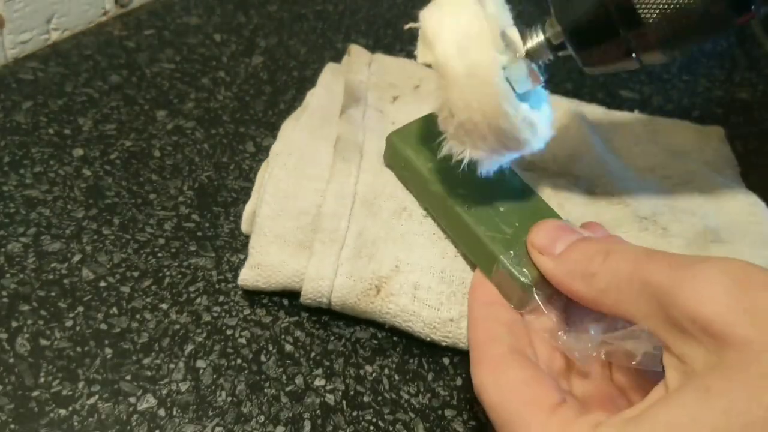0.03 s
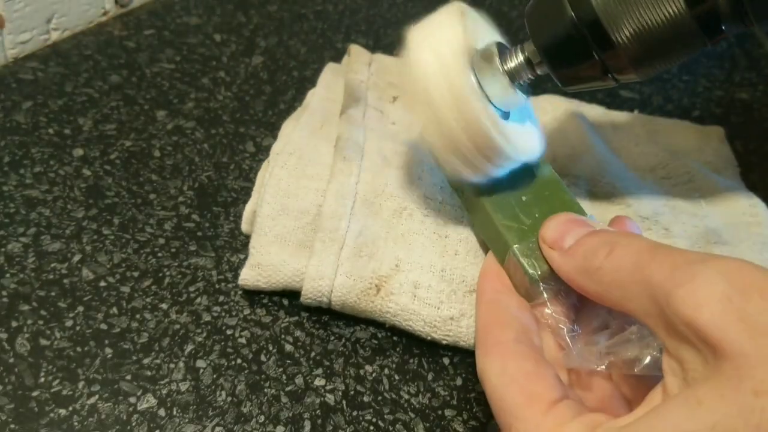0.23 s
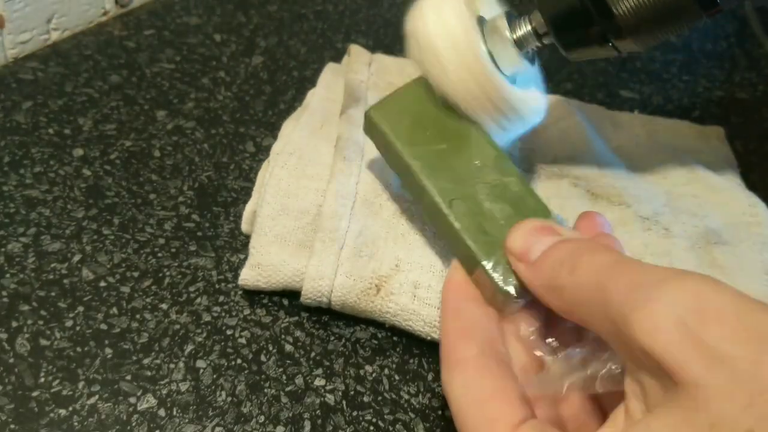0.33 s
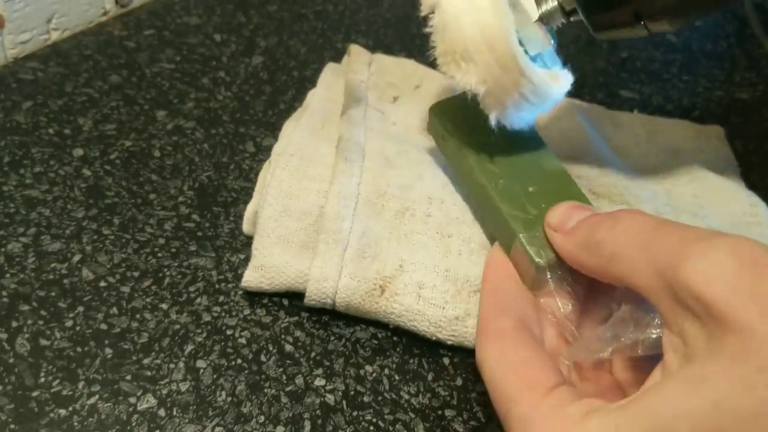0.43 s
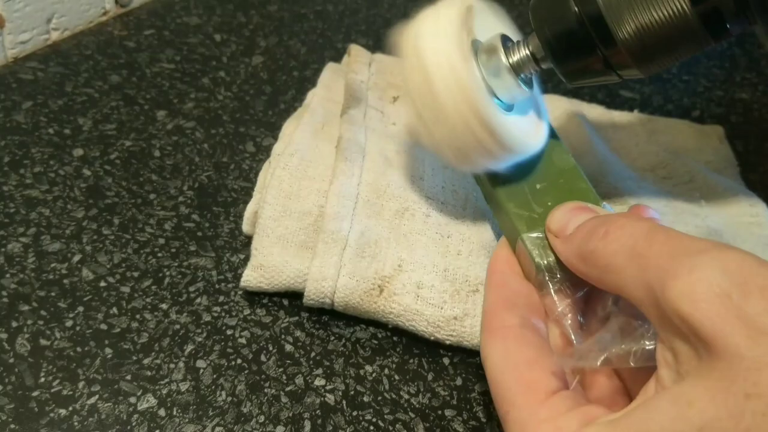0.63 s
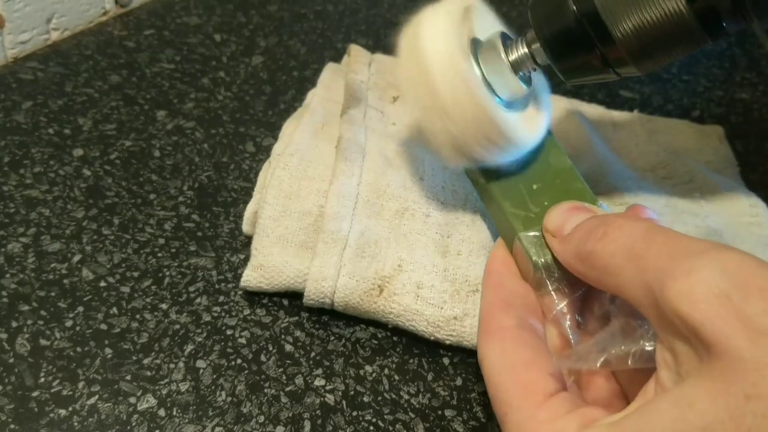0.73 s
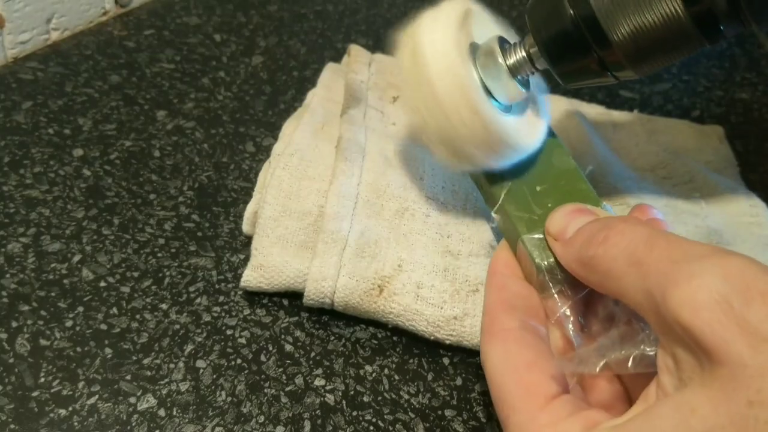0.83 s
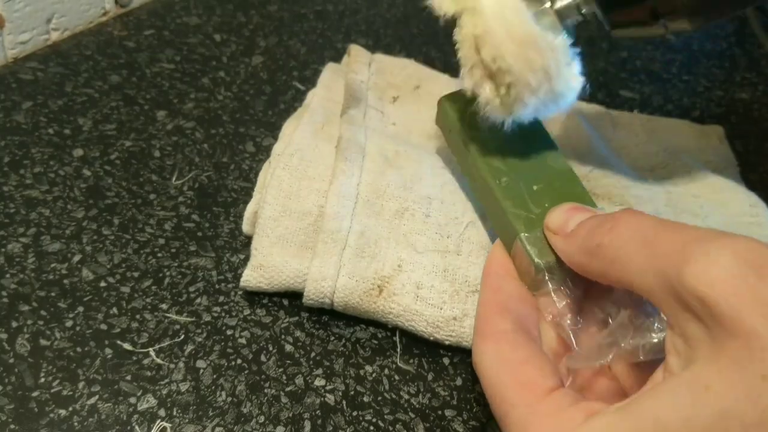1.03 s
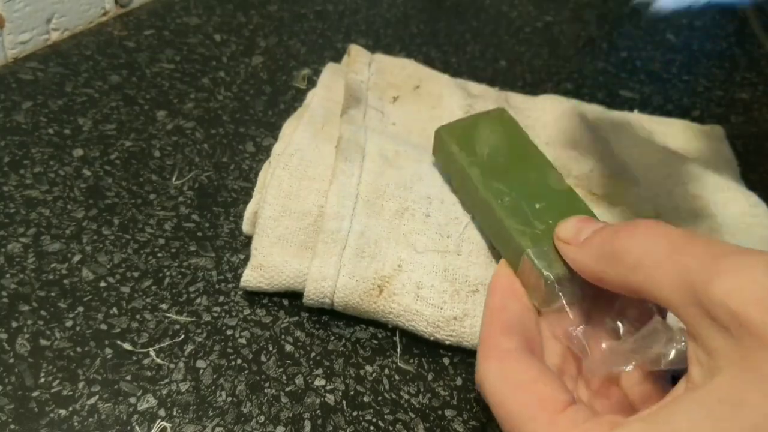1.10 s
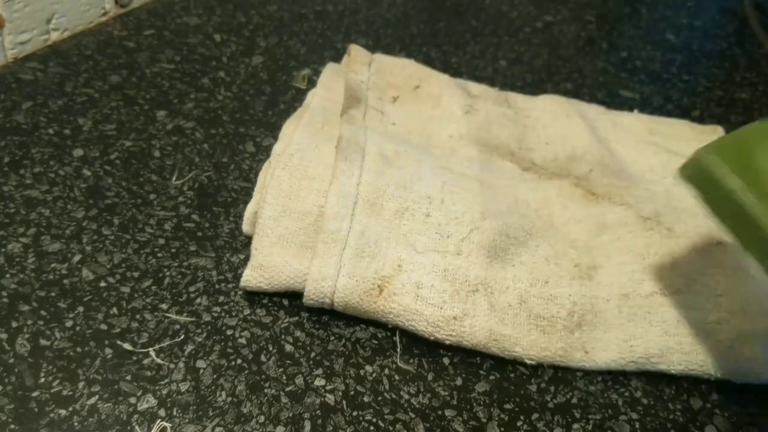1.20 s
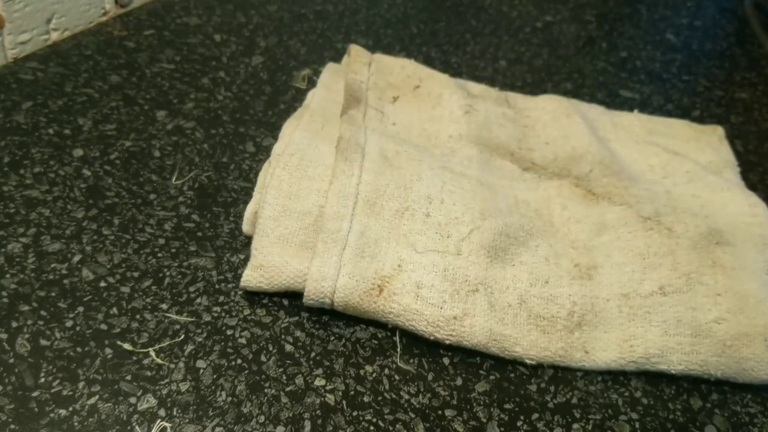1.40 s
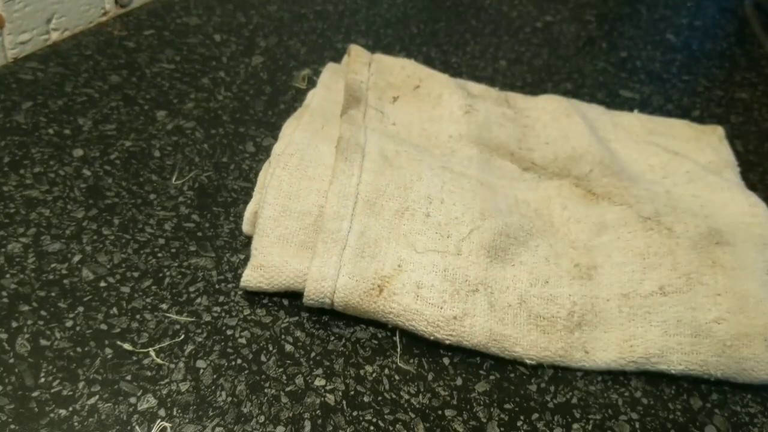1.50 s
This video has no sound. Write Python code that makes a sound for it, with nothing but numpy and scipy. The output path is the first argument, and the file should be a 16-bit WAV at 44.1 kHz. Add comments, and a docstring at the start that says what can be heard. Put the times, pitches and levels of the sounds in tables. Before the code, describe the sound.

A cordless drill whirs briefly and stops with a clunk, then runs faster and longer before a second clunk. Its cloth buffing wheel flaps softly against a bar of polishing compound, close by in a quiet room.

```python
"""In a quiet room, a cordless drill spins a cloth buffing wheel against a bar of polishing compound.
The housing rings as the motor pulls away. Motor and gear teeth hum and whine with the speed over
a rasp of brushes and gears; the cloth flaps on the bar. At 0.4 s the brake stops the chuck with a clunk.
A second, faster and longer run starts at 0.5 s and ends in another clunk at 1.0 s."""
import sys
import numpy as np
from scipy import signal
from scipy.fft import rfft, irfft
from scipy.io import wavfile

SR = 44100
rng = np.random.default_rng(int(sys.argv[2]) if len(sys.argv) > 2 else 0)


def store_pcm(level_fs):
    """Save levels as 16-bit WAV."""
    pcm = np.round(np.clip(level_fs, -1, 1) * 32767).astype(np.int16)
    wavfile.write(sys.argv[1], SR, np.atleast_2d(pcm).T)


N = 68355
T = np.arange(N) / SR
BIN_HZ = np.fft.rfftfreq(N, 1 / SR)
BAND_EDGE_HZ = 15750


def amp(db):
    """Decibels to gain."""
    return 10 ** (np.asarray(db) / 20)


def unit_rms(x):
    """Scale to rms 1."""
    return x / np.sqrt(np.mean(x ** 2) + 1e-20)


def curve(points):
    """Straight lines through (time_s, value) points."""
    return np.interp(T, *np.transpose(points))


def colour(x, spectrum):
    """Filter by (freq_hz, gain_db) points."""
    freq_hz, gain_db = np.transpose(spectrum)
    bin_db = np.interp(np.log(BIN_HZ + 1), np.log(freq_hz), gain_db)
    return irfft(rfft(x) * amp(bin_db), N)


def noise(spectrum):
    """Coloured noise, rms 1."""
    return unit_rms(colour(rng.standard_normal(N), spectrum))


def drift(cutoff_hz):
    """Low-passed random wander, rms 1."""
    return unit_rms(irfft(rfft(rng.standard_normal(N)) / (1 + (BIN_HZ / cutoff_hz) ** 4), N))


def rough_tone(cycles, roughness, flutter_hz):
    """Tone with random flutter in amplitude and phase."""
    flutter = 1 + roughness * (drift(flutter_hz) + 1j * drift(flutter_hz))
    return (flutter * np.exp(2j * np.pi * (cycles + rng.random()))).real


def mode(start_s, freq_hz, level_db, t60_s, rise_s=0.0019):
    """One decaying vibration."""
    age_s = np.maximum(T - start_s, 0)
    envelope = np.minimum(age_s / rise_s, 1) * amp(level_db - 60 * age_s / t60_s)
    return envelope * np.sin(2 * np.pi * freq_hz * age_s)


# Room noise: freq_hz, gain_db
ROOM_SPECTRUM = [(12, -42), (20, 2), (85, -4), (140, -9.5), (274, -15), (416, -14.5), (491, -16),
                 (725, -17.5), (1300, -22.5), (2150, -24.5), (15500, -37.5)]

def room_hush(level_db=-69.5):
    """Steady, low background noise."""
    return amp(level_db) * noise(ROOM_SPECTRUM)


def room_echo(source, gain_db=-16.5, t60_s=0.12):
    """Reflections form a faint, short tail."""
    age_s = T[:SR // 3]
    tail = rng.standard_normal(len(age_s)) * amp(-60 * age_s / t60_s)
    tail /= np.linalg.norm(tail)
    return amp(gain_db) * signal.fftconvolve(source, tail[None], axes=1)[:, :N]


# Flapping envelope: time_s, level_db
CLOTH_ENVELOPE = [(.19, -79), (.235, -69), (.4, -59), (.44, -90), (.52, -95), (.545, -50), (.59, -72),
                  (.64, -57.5), (.8, -60.5), (.97, -52), (1.015, -57.5), (1.045, -76)]
# Flapping colour: freq_hz, gain_db
CLOTH_SPECTRUM = [(20, -21), (60, 0), (110, 8), (220, 1.5), (310, 0), (420, -13), (1000, -29), (4000, -66)]

def cloth_flap():
    """The soft rim of the wheel beats the bar."""
    return noise(CLOTH_SPECTRUM) * amp(curve(CLOTH_ENVELOPE))


# Bursts of starting torque: start_s, length_s, level_db
TORQUE_BURSTS = [(0.12, 0.028, -57.5), (0.15, 0.042, -62), (0.185, 0.031, -53), (0.515, .026, -43.5)]
# Housing resonance: freq_hz, gain_db
HOUSING_SPECTRUM = [(300, -24.5), (2000, -17.5), (2850, -21), (3220, 1), (3550, -11.5), (4100, -15.5),
                    (5000, -30), (15000, -47)]

def housing_ring(rise_s=0.011, decay_s=0.0063):
    """The gearbox rattles at its resonance while the motor pulls away."""
    envelope = np.zeros(N)
    for start_s, length_s, level_db in TORQUE_BURSTS:
        attack = np.clip((T - start_s) / rise_s, 0, 1)
        release = np.exp(-np.maximum(T - start_s - length_s, 0) / decay_s)
        envelope += amp(level_db) * attack * release
    return envelope * noise(HOUSING_SPECTRUM)


# Brake stops: start_s, thud_db, knock_db, ring_db, thud_hz
BRAKE_STOPS = [(.402, -47, -38.5, -55, 118), (1.01, -39, -46.5, -63.5, 246)]
# Chuck modes: freq_hz, gain_db, t60_s
CHUCK_MODES = [(2000, 3, 0.083), (5050, 1, 0.079), (8970, -7.5, 0.12), (14000, -1, 0.086)]

def brake_clunk():
    """The spindle locks: a thud, a knock and a short ring of the steel chuck."""
    out = np.zeros(N)
    for start_s, thud_db, knock_db, ring_db, thud_hz in BRAKE_STOPS:
        out += mode(start_s, thud_hz, thud_db, t60_s=0.064)
        out += mode(start_s, freq_hz=663, level_db=knock_db, t60_s=0.031)
        for freq_hz, gain_db, t60_s in CHUCK_MODES:
            out += mode(start_s, freq_hz, ring_db + gain_db, t60_s)
    return out


# Imbalance partials: cycles_per_turn, gain_db, roughness
HUM_PARTIALS = [(.343, -57.5, .45), (.572, -63, 0.38), (1, -51, 0.26)]

def imbalance_hum(speed_hz, turns, full_speed_hz=271.4):
    """Out-of-balance rotor and planet gears shake the drill, harder with speed."""
    out = np.zeros(N)
    for cycles_per_turn, gain_db, roughness in HUM_PARTIALS:
        out += amp(gain_db) * rough_tone(cycles_per_turn * turns, roughness, flutter_hz=35)
    return out * (speed_hz / full_speed_hz) ** 1.78


# Rasp envelope: time_s, gain_db
RASP_ENVELOPE = [(.11, -100), (.128, -66), (.185, -63.5), (.228, -48), (.26, -49.5), (.385, -47.5),
                 (.401, -48.5), (.412, -57.5), (.445, -95), (.51, -77), (.526, -59), (.546, -45.5),
                 (.6, -46.5), (.69, -42), (.8, -42), (.97, -41), (1.011, -42), (1.028, -62), (1.05, -93)]
# Impact colour: freq_hz, gain_db
RASP_SPECTRUM = [(100, -7.5), (430, -10.5), (620, -1.5), (900, -7), (1600, -2), (2450, -5), (3250, 2),
                 (3800, -1), (4600, -1.5), (5400, -2.5), (6300, -2), (7600, 0.5), (8600, -8.5), (10400, -8),
                 (11800, -1.5), (13000, 4), (14300, -4.5), (15800, -13)]
# Extra filter on the stereo side signal: freq_hz, gain_db
RASP_SIDE_SPECTRUM = [(100, -52), (3000, -58), (5500, -6), (7000, -30), (8500, -5.5), (10500, -3.5),
                      (13000, -29), (16000, 4)]

def brush_and_gear_rasp(speed_hz, turns, grain_db=3.5, buzz_db=-6.5, flicker_db=1.03, trim_db=-1):
    """Tiny impacts of brushes and teeth, partly repeating each turn, with a slight, steady flutter."""
    tick_depth, flutter_depth, flutter_hz = 0.13, 0.1, 42.2
    grains = rng.standard_normal(N) * amp(grain_db * rng.standard_normal(N))
    buzz = np.zeros(N)
    for harmonic in range(2, 90):
        in_band = harmonic * speed_hz < BAND_EDGE_HZ
        buzz += np.cos(2 * np.pi * (harmonic * turns + rng.random())) * rng.rayleigh() * in_band
    impacts = unit_rms(grains) + amp(buzz_db) * unit_rms(buzz)
    ticks = 1 + tick_depth * (np.cos(2 * np.pi * turns) + np.cos(2 * np.pi * 4 * turns))
    flutter = 1 + flutter_depth * np.cos(2 * np.pi * flutter_hz * T)
    flicker = amp(flicker_db * drift(cutoff_hz=500))
    mid = unit_rms(colour(impacts * ticks * flutter * flicker, RASP_SPECTRUM))
    side = colour(noise(RASP_SPECTRUM), RASP_SIDE_SPECTRUM)
    return np.array([mid + side, mid - side]) * amp(trim_db + curve(RASP_ENVELOPE))


# Motor and gear partials: cycles_per_turn, slow_db, middle_db, full_db
WHINE_PARTIALS = [(4, -68, -65, -45.5), (5.71, -72, -68, -60), (8, -90, -84, -74), (12, -72, -55, -53),
                  (12.353, -53.5, -72, -46), (16, -63.5, -41, -80), (20, -47, -62, -63.5),
                  (24, -48.5, -46, -44.5), (24.706, -54, -60, -78), (40, -59.5, -73, -64),
                  (41.42, -73, -62, -54.5)]
# Motor speeds for those gains: slow_hz, middle_hz, full_hz
WHINE_SPEEDS_HZ = [175, 203.5, 271.4]

def motor_whine(speed_hz, turns, end_s=1.035):
    """Commutator and gear-mesh tones, each louder at the speed where the housing favours it."""
    out = np.zeros(N)
    for cycles_per_turn, *gains_db in WHINE_PARTIALS:
        gain = amp(np.interp(speed_hz, WHINE_SPEEDS_HZ, gains_db))
        out += gain * rough_tone(cycles_per_turn * turns, roughness=0.16, flutter_hz=108)
    low_speed_fade = np.clip(speed_hz / WHINE_SPEEDS_HZ[0], 0, 1) ** 2
    return out * low_speed_fade * (T < end_s)


# Motor rotation, stepping with the trigger: time_s, speed_hz
MOTOR_SPEED = [(.12, 20.5), (.19, 74.5), (.215, 151), (.24, 159), (.25, 163.5), (.28, 166), (.345, 165.5),
               (.377, 172.5), (.386, 160.5), (.4, 151), (.412, -0.5), (.515, 0), (.538, 222), (.558, 228.5),
               (.564, 203), (.58, 197.5), (.607, 208.5), (.617, 222.5), (.651, 226.5), (.657, 266.5),
               (.68, 274.5), (.698, 283.5), (.8, 283.5), (.955, 283), (.982, 282), (1.012, 257),
               (1.04, 168)]
# Envelope of whine and hum: time_s, gain_db
TONE_ENVELOPE = [(.185, -46), (.215, 0), (.248, -0.5), (.39, 0), (.412, -7), (.525, -17), (.545, -1),
                 (.57, -2.5), (.7, -1), (.95, 0.5), (.985, -2.5), (1.008, -6), (1.035, -29.5)]

def motor(wobble_depth=0.0013):
    """One slightly wobbling shaft speed drives rasp, whine and hum."""
    speed_hz = np.maximum(curve(MOTOR_SPEED), 0) * (1 + wobble_depth * drift(cutoff_hz=60.3))
    turns = np.cumsum(speed_hz) / SR
    rasp = brush_and_gear_rasp(speed_hz, turns)
    tones = motor_whine(speed_hz, turns) + imbalance_hum(speed_hz, turns)
    return rasp + tones * amp(curve(TONE_ENVELOPE))


def scene():
    """The drill close by, over the hush of the room."""
    drill = motor() + cloth_flap() + housing_ring() + brake_clunk()
    return drill + room_echo(drill) + room_hush()


def record(dry):
    """Low-pass at the band edge."""
    lowpass = signal.firwin(511, BAND_EDGE_HZ, window=("kaiser", 9), fs=SR)
    return signal.oaconvolve(dry, lowpass[None], "same")


dry = scene()
out = record(dry)
store_pcm(out)
```